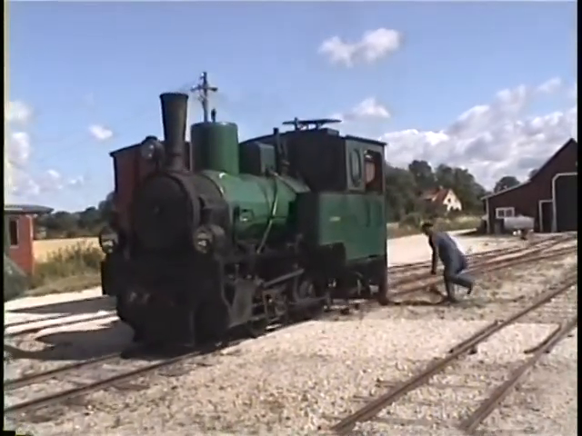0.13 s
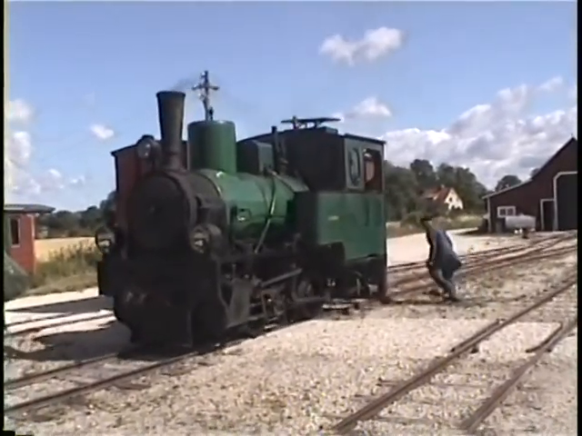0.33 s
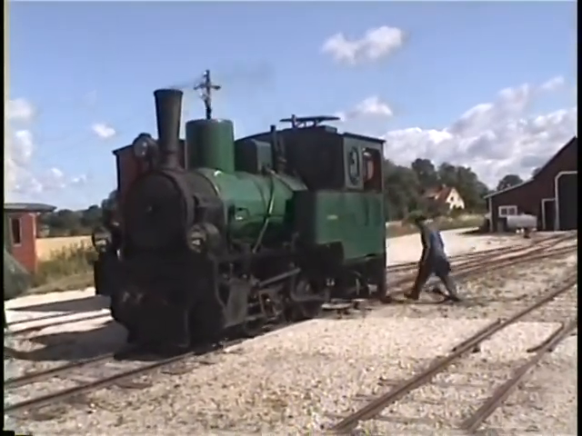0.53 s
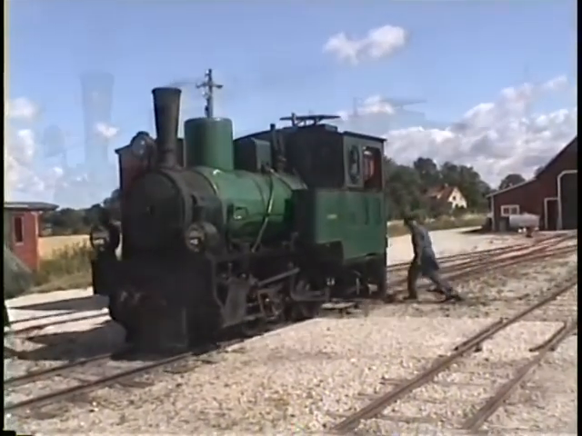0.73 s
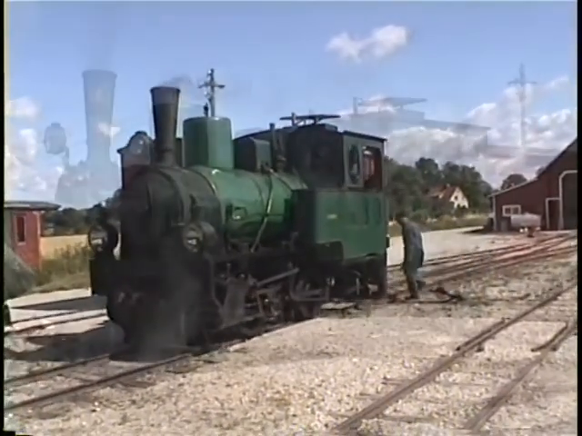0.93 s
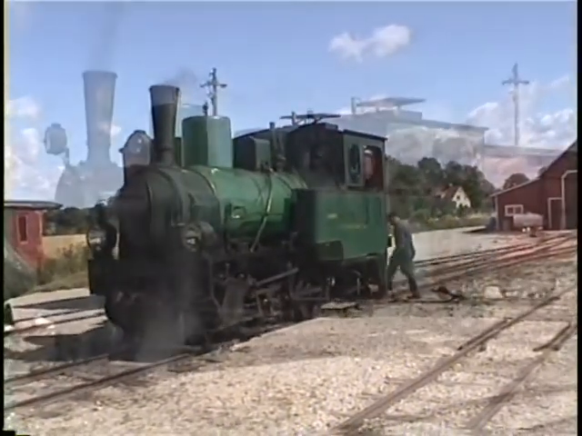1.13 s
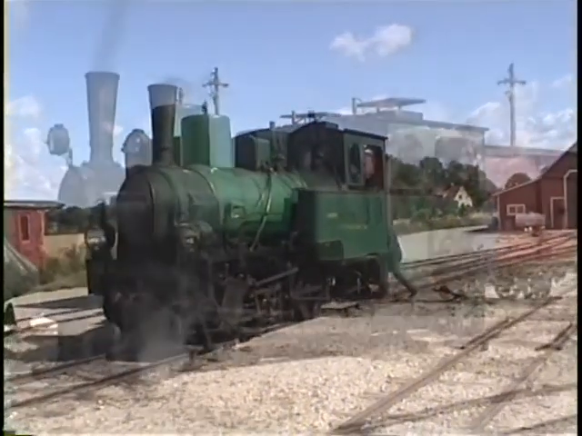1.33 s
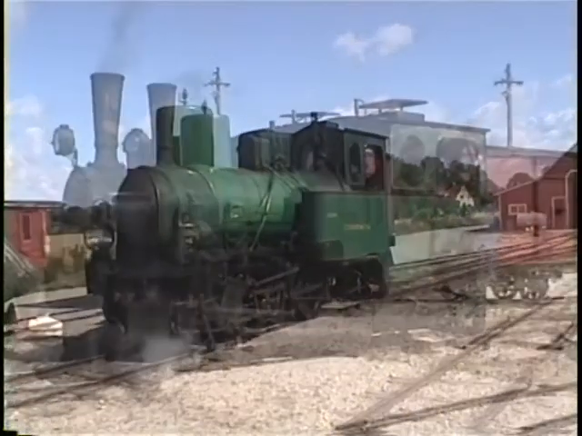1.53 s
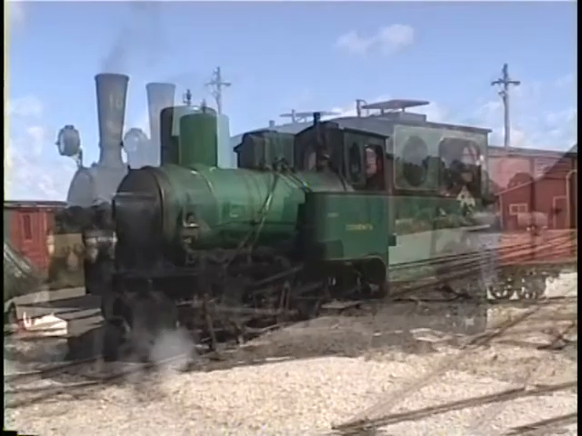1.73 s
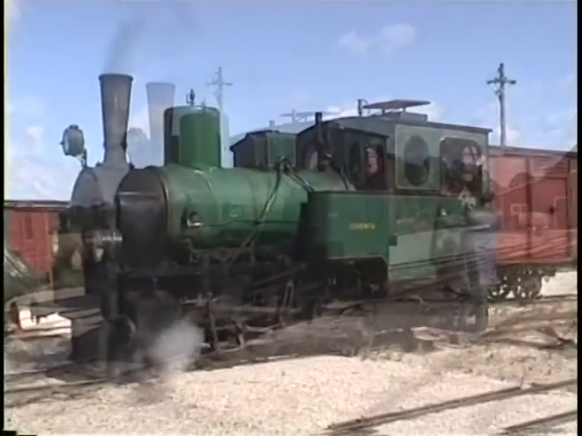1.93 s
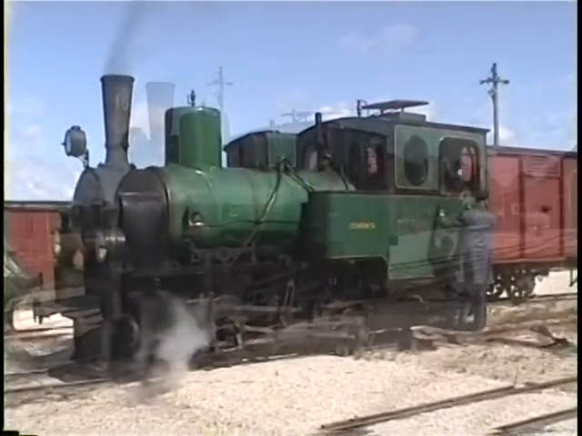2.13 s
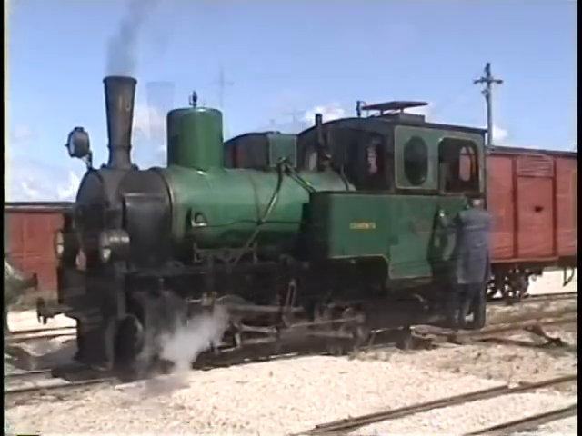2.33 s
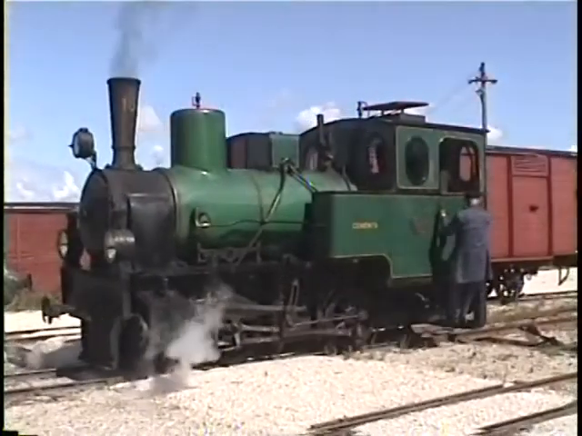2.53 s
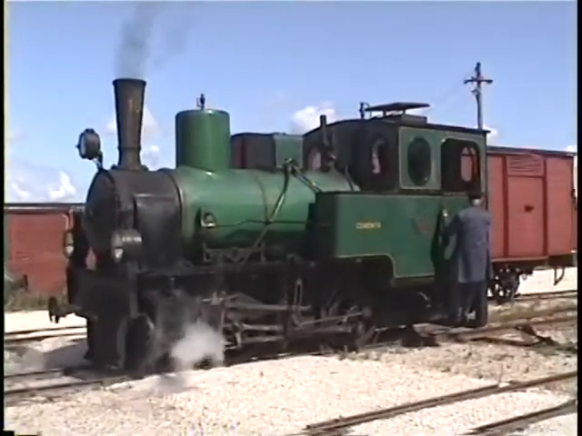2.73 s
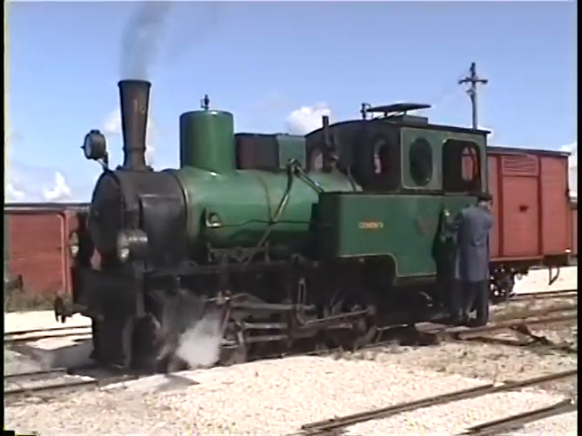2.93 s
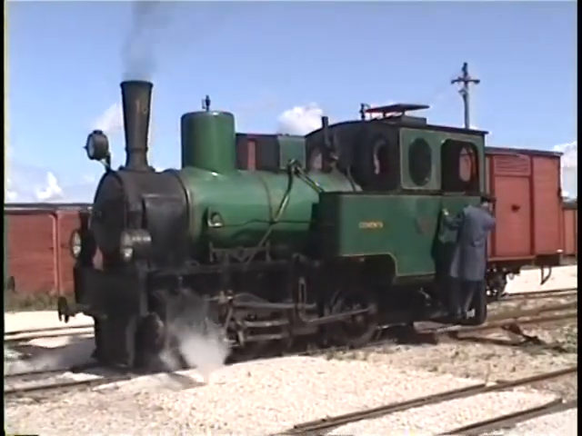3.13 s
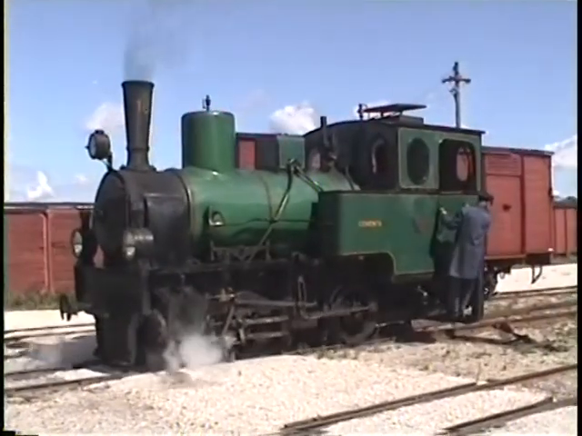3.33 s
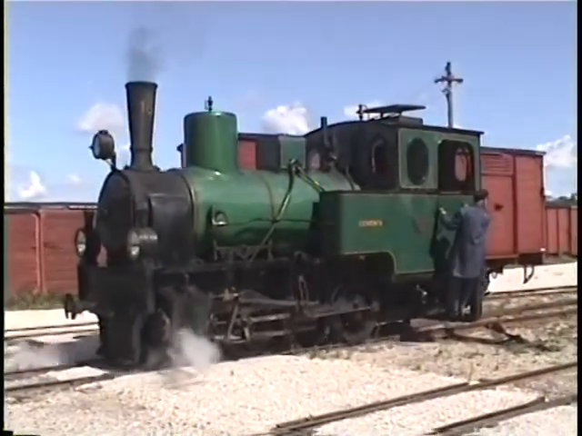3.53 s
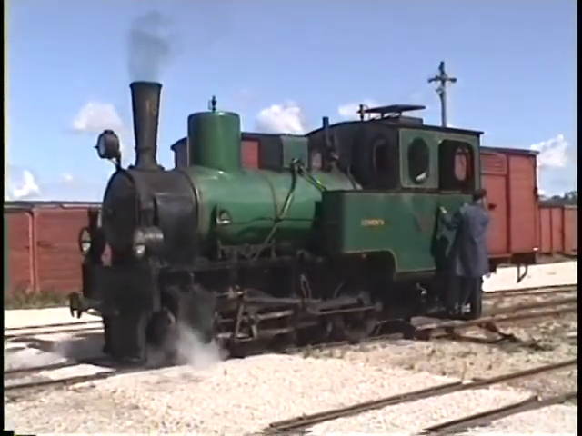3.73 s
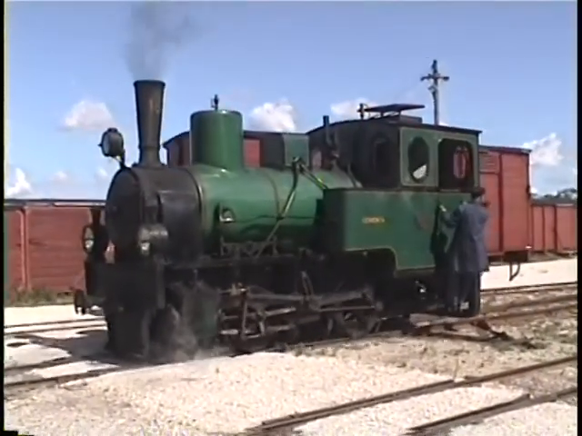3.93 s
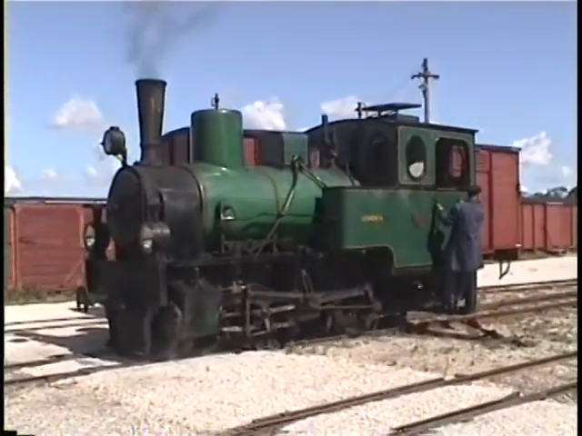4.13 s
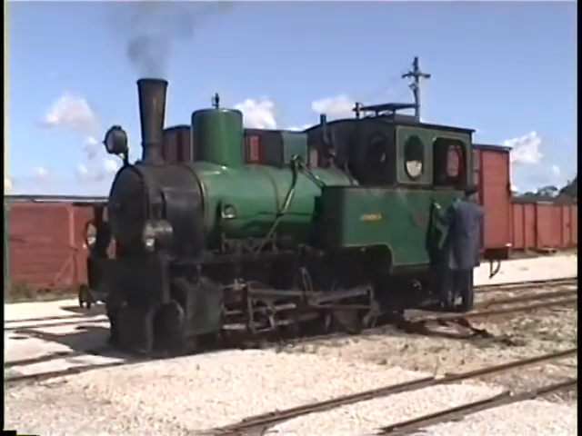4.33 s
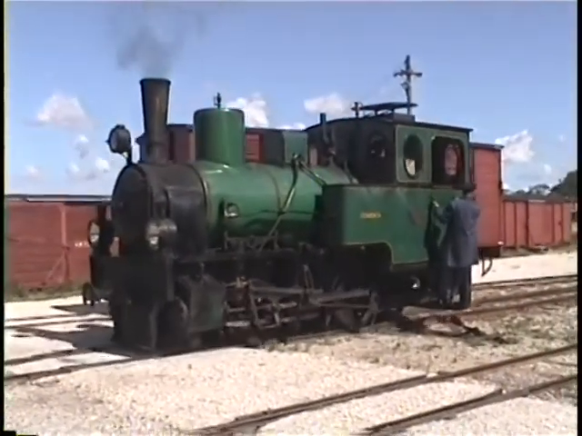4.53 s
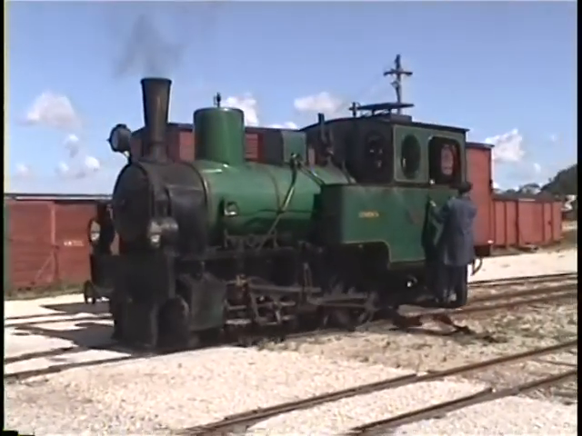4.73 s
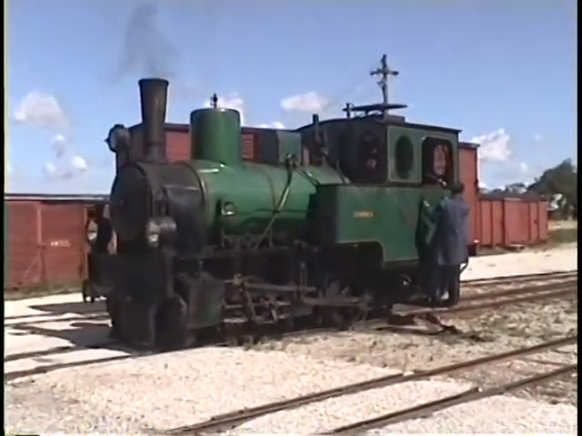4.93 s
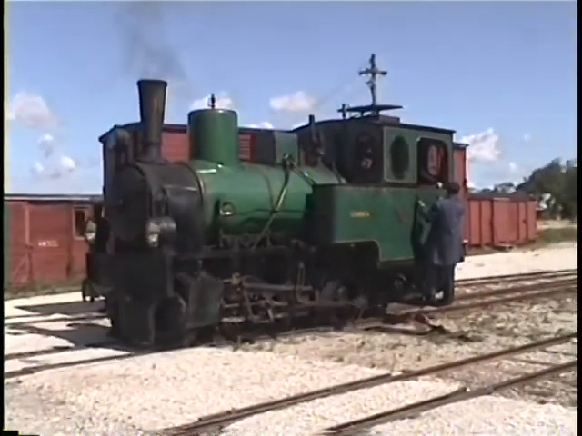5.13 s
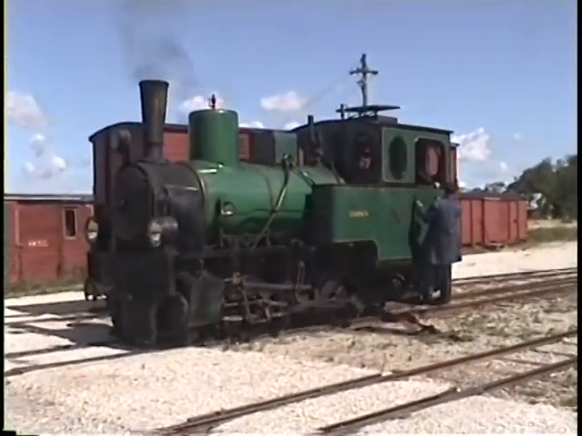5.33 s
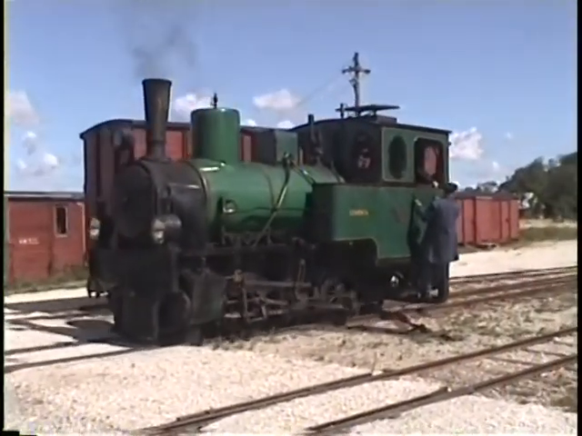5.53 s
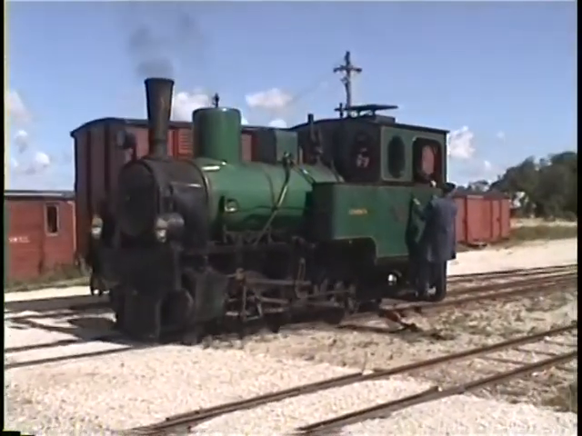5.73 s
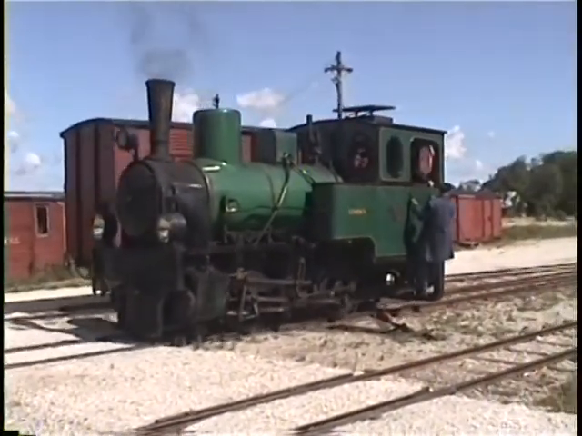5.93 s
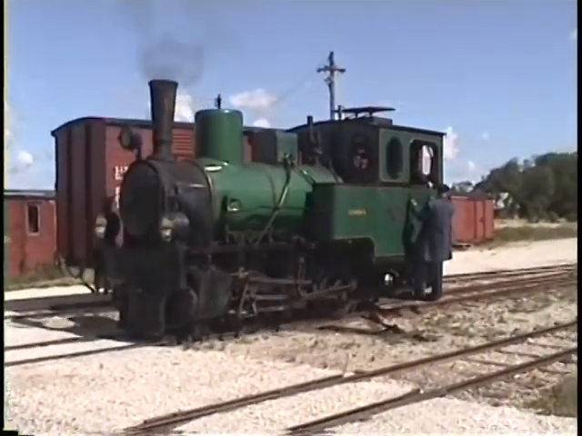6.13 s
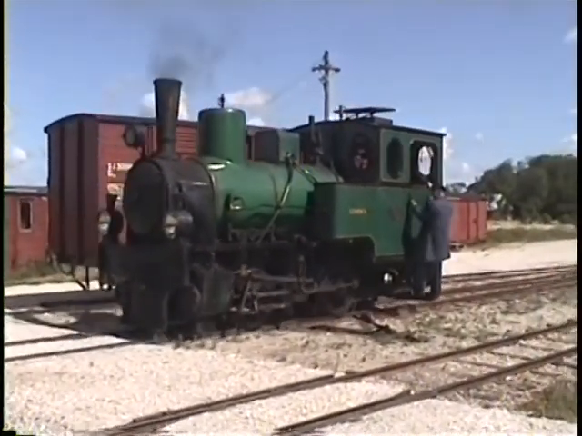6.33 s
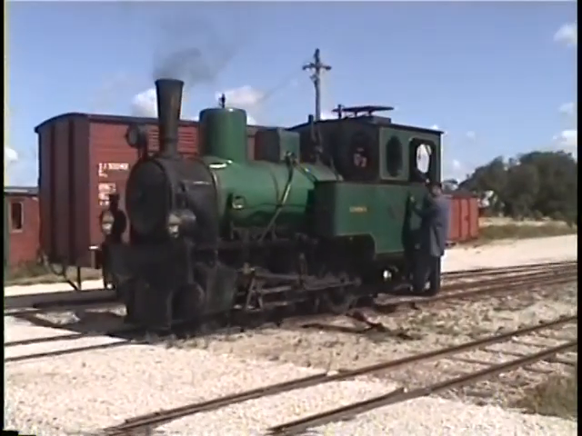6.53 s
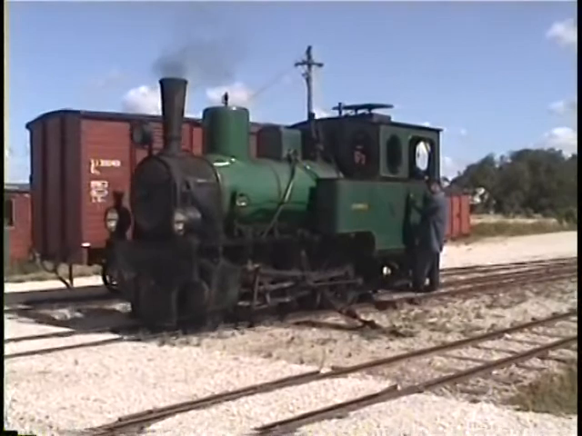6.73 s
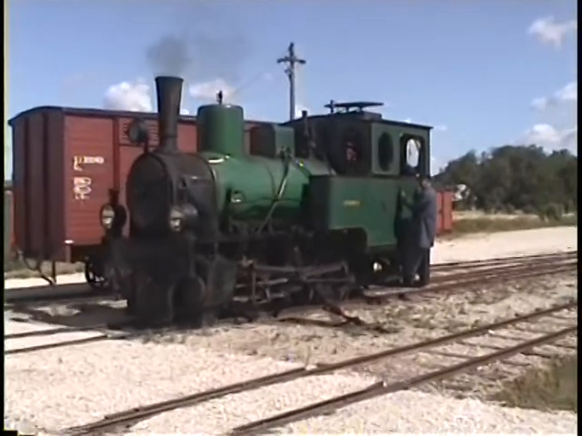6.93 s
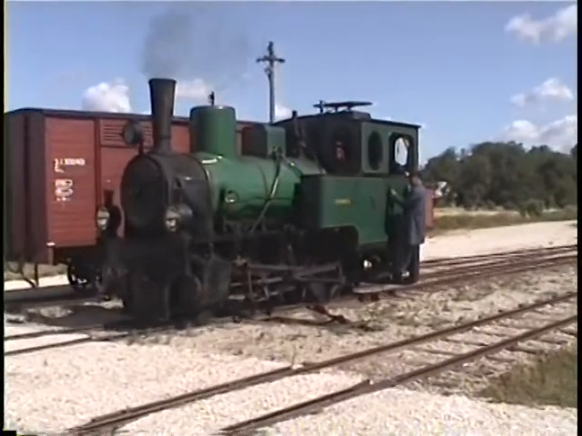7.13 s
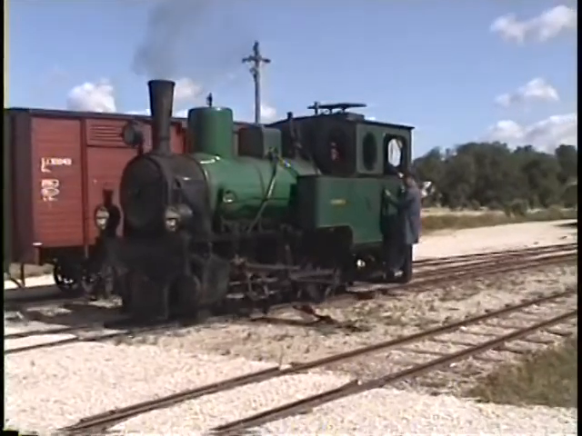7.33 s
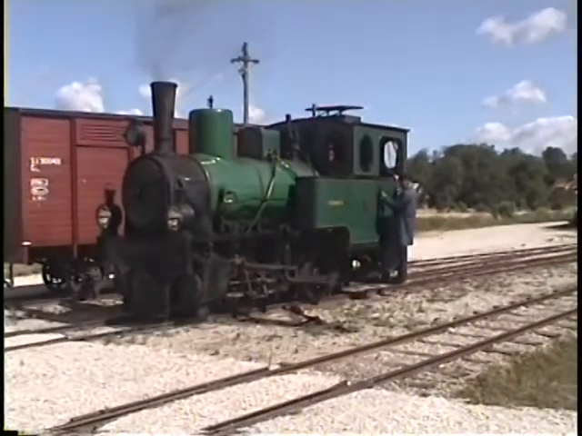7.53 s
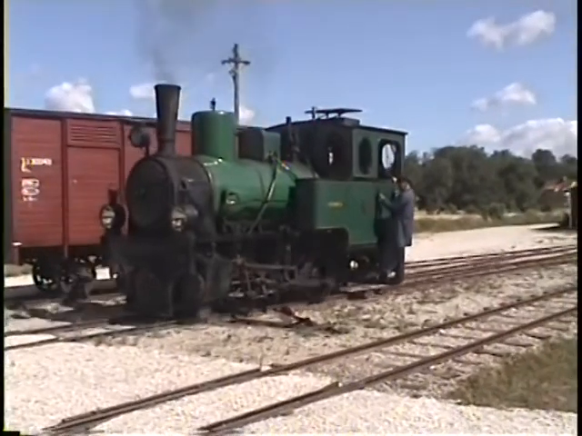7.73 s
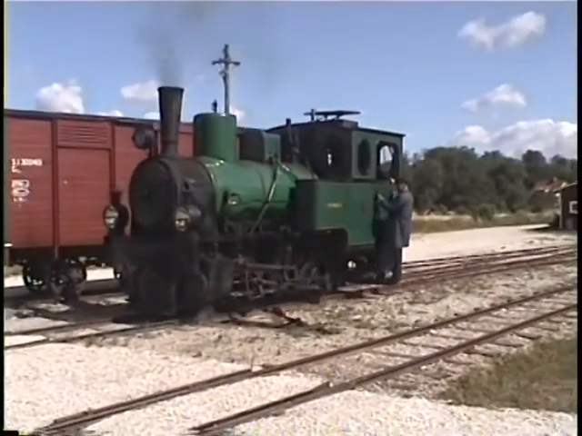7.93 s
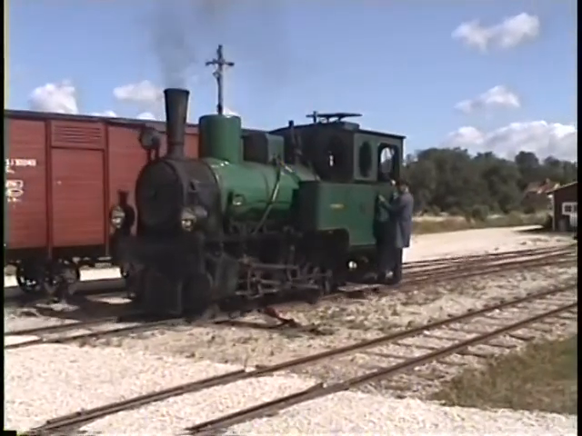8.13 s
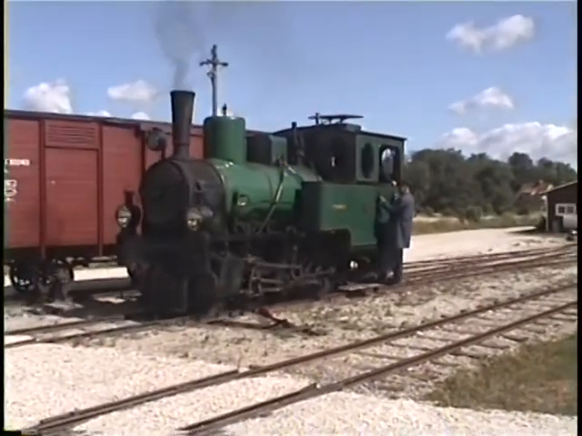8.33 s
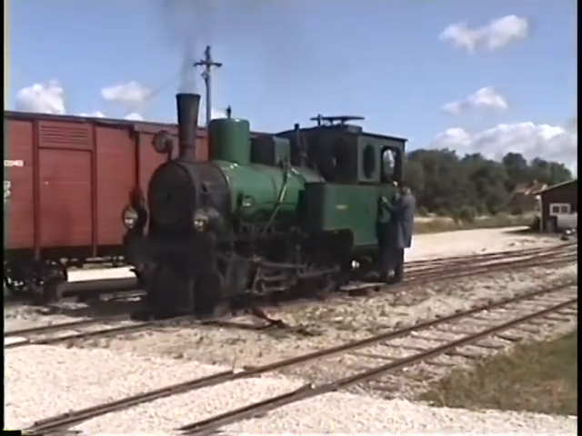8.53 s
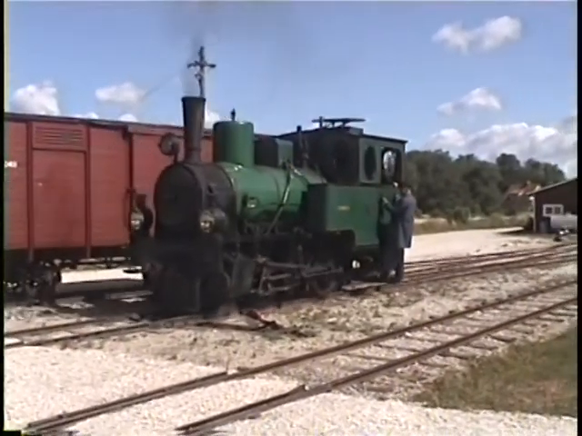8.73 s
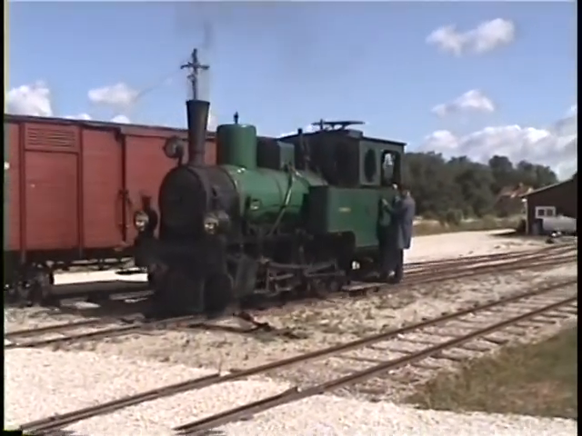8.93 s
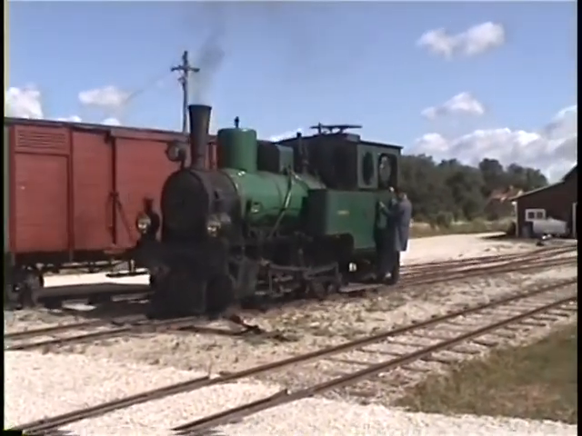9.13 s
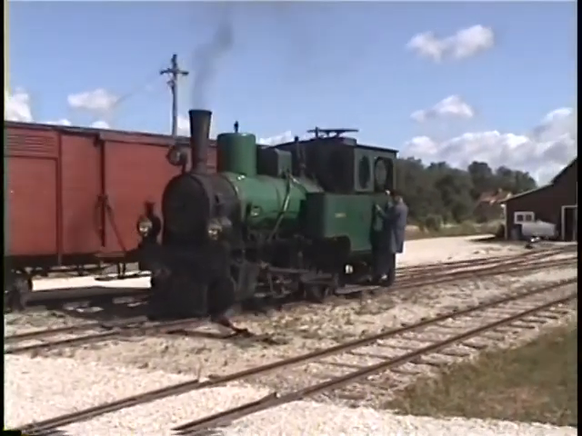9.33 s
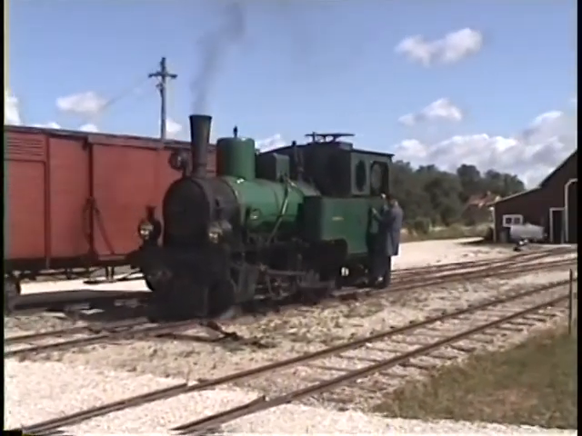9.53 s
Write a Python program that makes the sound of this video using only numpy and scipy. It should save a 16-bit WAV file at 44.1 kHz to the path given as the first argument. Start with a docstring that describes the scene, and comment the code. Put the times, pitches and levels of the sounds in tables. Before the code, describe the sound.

Loud escaping steam climbs in pitch and stops abruptly; quiet follows, then dry ticks, hard metal bangs and a run of loose iron clanking over soft hissing.

```python
"""Small steam locomotive in a yard

A thin steam leak stops; a cylinder cock then blows, rising in pitch until it is shut: shaped turbulent noise.
The boiler hisses, with wavering narrow bands, and its fire rumbles, all as filtered noise; a gland sings. Loose
ironwork ticks, squeaks, clinks and clanks; wagons and ground echo the clanks, clinks, squeaks and lever, not
the ticks, chatter or steam. One microphone with a limiter picks it all up."""
import sys
import numpy as np
from scipy import signal
from scipy.fft import rfft, irfft, next_fast_len
from scipy.io import wavfile
from scipy.ndimage import uniform_filter1d, map_coordinates

SR = 44100
rng = np.random.default_rng(int(sys.argv[2]) if len(sys.argv) > 2 else 0)


def store_wav(level_fs):
    """Save 16-bit WAV to argv[1]."""
    pcm = np.round(np.clip(np.atleast_2d(level_fs), -1, 1) * 32767)
    wavfile.write(sys.argv[1], SR, pcm.T.astype(np.int16))


N = 427769
T = np.arange(N) / SR


def amp(db):
    """Decibel law: level in dB to linear gain."""
    return 10 ** (np.asarray(db) / 20)


def unit(x):
    """Normalisation of the mean power: scales to rms 1."""
    return x / np.sqrt(np.mean(x ** 2) + 1e-20)


def along(points, hz):
    """Logarithmic frequency scale: interpolates (Hz, value) points on it."""
    f, v = np.transpose(points)
    return np.interp(np.log(hz + 1), np.log(f + 1), v)


def curves(rows):
    """Linear interpolation in time: one value per sample for each column after the time."""
    s, *cols = np.transpose(rows)
    return [np.interp(T, s, c) for c in cols]


def wobble(rate, size=N):
    """Slow random modulation: a smooth curve through `rate` random knots a second."""
    knots = rng.standard_normal(int(size * rate / SR) + 4)
    return map_coordinates(knots, [T[:size] * rate])


def ramp(start, end):
    """Linear growth: rises steadily from 0 to 1 between two times."""
    return np.clip((T - start) / max(end - start, 1e-3), 0, 1)


def release(s, db_per_s):
    """Exponential decay: 1 until time s, then a steady fall in dB."""
    return amp(-db_per_s * np.maximum(T - s, 0))


def swell(t, length):
    """Critically damped pulse: rises to 1 after length seconds, then dies away."""
    u = np.maximum(t, 0) / max(length, 1e-4)
    return u * np.exp(1 - u)


def filtered(x, response):
    """Linear filtering: multiplies the spectrum by a complex response of frequency."""
    m = next_fast_len(len(x) + 4096, True)
    return irfft(rfft(x, m) * response(np.fft.rfftfreq(m, 1 / SR)), m)[:len(x)]


def colour(points):
    """Spectral envelope: the response through (Hz, dB) points."""
    return lambda f: amp(along(points, f))


def modes(rows):
    """Modal superposition: sums (Hz, width Hz, dB) resonances with steep skirts."""
    def response(f):
        total = 0
        for centre, width, db in rows:
            damping = 1j * f * 2 * width  # doubled, because squaring narrows the peak
            total = total + amp(db) * (damping / (centre * centre - f * f + damping)) ** 2
        return total
    return response


def noise(response, size=N):
    """Coloured noise: shapes white noise by a response, to rms 1."""
    return unit(filtered(rng.standard_normal(size), response))


def breathy(hz, width_hz, size=N):
    """Quadrature modulation: carries a narrow band of noise on a pitch that may glide."""
    phase = 2 * np.pi * np.cumsum(hz * np.ones(size)) / SR
    skirt = lambda f: 1 / (1 + (f / width_hz) ** 2)
    return noise(skirt, size) * np.cos(phase) + noise(skirt, size) * np.sin(phase)


def eddies(x, depth_db):
    """Turbulent intermittency: lifts and drops patches of the spectrum."""
    z = signal.stft(x, nperseg=1024)[2]
    across_pitch = uniform_filter1d(rng.standard_normal(z.shape), size=4, axis=0)
    field = uniform_filter1d(across_pitch, size=14, axis=1)
    return unit(signal.istft(z * amp(depth_db * unit(field)), nperseg=1024)[1][:N])


def scattered(x, share, count=10):
    """Comb interference: early bounces off ground and boiler ripple the spectrum."""
    delays = rng.integers(SR // 1000, SR // 80, count)
    bounces = sum(rng.choice([-1, 1]) * np.roll(x, d) for d in delays)
    return unit(x + share * bounces)


def tap(t):
    """Damped oscillation: a couple of cycles of ring, as at the first contact of two iron parts."""
    return np.sin(2 * np.pi * 920 * t) * swell(t, 0.00056)


def ring(hz, t, length):
    """Damped mode: builds up while the parts are in contact, then dies away."""
    return np.sin(2 * np.pi * (hz * t + rng.random())) * swell(t, length) ** 1.1


def add(track, s, x):
    """Linear superposition: mixes x into the track at time s."""
    part = track[max(round(s * SR), 0):][:len(x)]
    part += x[:len(part)]


# Spectrum of the thin leak. Each row: frequency in Hz, level in dB.
LEAK_COLOUR = [(900, -21), (2000, -17), (2400, -5.5), (3000, -9), (3450, -16), (4200, -22), (4800, -17.5),
               (5600, -20), (8000, -18.5), (8900, -3.5), (9900, -3.5), (11600, -9.5), (13700, -25),
               (15500, -47)]
LEAK_DB, LEAK_SHUT_S, LEAK_FALL_DB_PER_S = -34, 0.366, 520
WEEP_DB = -66  # what still escapes until the cock opens
COCK_OPEN_S, COCK_FULL_S = 0.59, 2.71


def leak():
    """Turbulent jet noise: a thin leak that is pinched off and weeps on faintly."""
    pinched = amp(LEAK_DB) * release(LEAK_SHUT_S, LEAK_FALL_DB_PER_S)
    weep = amp(WEEP_DB) * release(COCK_OPEN_S, 18)
    steam = eddies(noise(colour(LEAK_COLOUR)), depth_db=2.0)
    return (pinched + weep) * scattered(steam, share=0.071)


# Spectra of hiss, fire and low rumble. Each row: frequency in Hz, level in dB.
HISS_COLOUR = [(500, 1.5), (1200, 2.5), (2300, 2), (3000, 3), (3750, -2), (4100, 2), (5100, 1),
               (6100, -0.5), (7400, 4), (8450, 0), (10600, 1), (12000, -3), (14000, -10.5), (15500, -40)]
FIRE_COLOUR = [(20, -8), (70, -4), (115, 0), (170, 0.5), (290, -4), (420, -9), (780, -4), (1050, -15),
               (2000, -18), (5000, -56)]
RUMBLE_COLOUR = [(15, -6.5), (35, -0.5), (60, -4.5), (100, -9.5), (200, -19), (600, -50)]
# Pipe resonances in the hiss. Each row: frequency in Hz, width in Hz, level in dB.
PIPES = [(1000, 30, -6), (4490, 200, 1), (4680, 49, -3), (5500, 70, -7), (7720, 150, -2.5),
         (9030, 270, 2.5), (10500, 130, 0)]
# Wavering narrow bands in the hiss, as reflections colour it while the microphone moves.
# Each row: centre in Hz, width in Hz, level in dB relative to the bands' common level.
WAVERING_BANDS = [(1855, 100, -1), (2064, 20, -5), (2238, 27, -5.5)]
BAND_WAVER, BAND_SWING_DB = .006, 2  # share of the centre frequency; swing of each band's level
HISS_FLUTTER_DB, HISS_PATCHY_DB = .5, 1.2
# the hiss idles; the built part is added to it as the build goes from 0 to 1
IDLE_DB, BUILT_DB, BUILD_FROM_S, BUILD_TO_S = -59.5, -43, 3.91, 6.33
# the pipe drains in one soft puff behind the closed cock
DRAIN_S, DRAIN_RISE_S, DRAIN_DB = 3.66, 0.13, -57
FIRE_IDLE_DB, FIRE_DRAUGHT_DB = -58, -6  # the fire at rest; its draught relative to the built hiss


def boiler():
    """Flow noise in resonant pipes: hiss, its wavering bands and fire draught build once the cock is shut."""
    build = ramp(BUILD_FROM_S, BUILD_TO_S) ** 1.23
    puff = amp(DRAIN_DB) * swell(T - DRAIN_S, DRAIN_RISE_S)
    steam = amp(IDLE_DB) + amp(BUILT_DB) * build + puff
    hiss_db = 20 * np.log10(steam) + HISS_FLUTTER_DB * wobble(20)
    pipes = lambda f: amp(along(HISS_COLOUR, f)) + abs(modes(PIPES)(f))
    hiss = amp(hiss_db) * scattered(eddies(noise(pipes), depth_db=HISS_PATCHY_DB), share=0.06)
    bands = np.zeros(N)
    for hz, width, db in WAVERING_BANDS:
        swing = amp(db + BAND_SWING_DB * wobble(6))
        bands += swing * breathy(hz * (1 + BAND_WAVER * wobble(4)), width)
    bands *= amp(0.74 * hiss_db - 22.0)  # grow more slowly than the hiss
    draught = amp(FIRE_IDLE_DB) + amp(FIRE_DRAUGHT_DB + BUILT_DB) * build
    flicker = amp(1.75 * wobble(11))
    fire = draught * flicker * eddies(noise(colour(FIRE_COLOUR)), depth_db=3.0)
    rumble = amp(-56.5) * noise(colour(RUMBLE_COLOUR))
    return hiss + bands + fire + rumble


# Spells in which the running gear shakes. Each row: start in seconds, hold in seconds,
# chatter level in dB, shudder level in dB, both before the mix of parts.
SHAKES = [(-.03, 0.063, -40.5, -51), (0.07, 0.054, -39.5, -49), (0.61, 0.058, -48.5, -50),
          (4.59, 0.48, -53.5, -60), (5.75, 0.31, -46, -56), (6.794, 0.045, -40.5, -53),
          (7.403, 0.13, -50, -43), (7.8, 0.074, -46, -39), (8.027, 0.97, -42, -40), (8.26, 0.24, -60, -36),
          (9.163, 0.24, -43.5, -41), (9.622, .08, -49, -39)]
# Spectrum of the small parts. Each row: frequency in Hz, level in dB.
CHATTER_COLOUR = [(90, -39), (200, 3.5), (290, 6), (480, -8), (690, -4), (1050, -9), (1600, -5),
                  (2800, -12.5), (5000, -40), (12000, -55)]
# Modes of the shuddering frame. Each row: frequency in Hz, width in Hz, level in dB.
SHUDDER = [(153.7, 43, 3), (264, 17, -3.5)]
# Modes in which the bodywork rings. Each row: frequency in Hz, width in Hz, level in dB.
BODY = [(184, 41, -1.5), (260, 29, 0), (390, 28, -5), (523, 31, -2), (630, 30, 3.5), (717, 31, -2.5),
        (799, 28, -2.5)]
SHAKE_ATTACK_S, SHAKE_FALL_DB_PER_S = 0.015, 80
CONTACTS_PER_S = 320


def chatter():
    """Random impact excitation: small parts touch and ring the bodywork; the frame shudders and rumbles."""
    loose, heavy = np.zeros(N), np.zeros(N)
    for s, hold, chatter_db, shudder_db in SHAKES:
        spell = ramp(s, s + SHAKE_ATTACK_S) * release(s + hold, SHAKE_FALL_DB_PER_S)
        loose += amp(chatter_db) * spell
        heavy += amp(shudder_db) * spell
    contacts = (rng.random(N) < CONTACTS_PER_S / SR) * rng.standard_normal(N)
    small_parts = amp(-4.0) * unit(filtered(contacts, colour(CHATTER_COLOUR)))
    bodywork = amp(-4.5) * unit(filtered(contacts, modes(BODY)))
    shudder = amp(-0.5) * heavy * noise(modes(SHUDDER))
    rumble = (amp(-2.5) * loose + amp(-12.0) * heavy) * noise(colour(FIRE_COLOUR))
    return loose * (small_parts + bodywork) + shudder + rumble


RATTLE_PER_S = 1300  # tiny contacts while the faces grind together


def grinding(response, size):
    """Shot noise: a quick shower of tiny contacts, coloured, of rms 1."""
    contacts = (rng.random(size) < RATTLE_PER_S / SR) * rng.standard_normal(size)
    return unit(filtered(contacts, response))


def burst(response, t, length, order=1, source=noise):
    """Pulsed noise: coloured noise under a swell, whose order delays and sharpens the onset."""
    envelope = swell(t, length) ** order
    return unit(envelope * source(response, len(t))) * np.sqrt(np.mean(envelope ** 2))


# Iron clanks. Each row: start in seconds, strength in dB, hardness of the contact in dB,
# shift from frame to plates in dB, basic length in seconds (each part scales it), boom pitch in Hz,
# boom delay in seconds, plate pitch in Hz.
CLANKS = [ (0.089, -27, 4.5, -3, 0.0038, 284, 0.007, 910), (0.103, -35, 5, 6, 0.006, 240, .002, 650),
          (0.141, -29.5, 5, -3.5, 0.0058, 290, 0.0036, 670),
          (0.384, -30.5, 0, -0.5, 0.005, 303, 0.011, 700), (0.62, -33.5, -3, -2, 0.0048, 279, 0.0021, 770),
          (0.829, -37, 2, -1.5, 0.0069, 282, 0.005, 769), (0.984, -45, -6, -2.5, 0.0062, 250, 0, 700),
          (1.727, -36.5, -1, -2, 0.0062, 258, 0.009, 780), (2.003, -41, -8, -1, 0.0063, 263, 0.0014, 581),
          (3.615, -40.5, 7, 5.5, 0.0088, 270, 0, 702), (3.687, -44, 13.5, 8.5, 0.0084, 270, 0.013, 760),
          (3.717, -42, -2, 3, 0.047, 275, 0.0048, 680), (4.854, -42, -1, 4, 0.016, 298, 0.0017, 695),
          (4.89, -40.5, -10, -7, .006, 220, 0, 700), (5.750, -15, 0.5, 1, 0.0076, 261, 0.0066, 936),
          (5.832, -13.5, 0.5, 1.5, 0.0078, 253, 0.0095, 773),
          (5.943, -16, -9.5, 1, 0.0074, 284, 0.0061, 650), (6.014, -22, -9.5, 0.5, 0.011, 275, 0.005, 550),
          (6.073, -26.5, -11, 0, 0.017, 270, 0.0018, 790), (6.756, -39.5, -2, 3.5, 0.015, 248, 0, 720),
          (6.802, -29, 1, 3.5, 0.01, 244, .003, 934), (7.811, -26.5, -4, 0, 0.014, 204, 0.0018, 730),
          (7.912, -35, -7, -4, 0.011, 217, 0.00021, 860), (8.027, -23, -2.5, -0.5, 0.011, 292, 0.0018, 638),
          (8.146, -22, 0, 0, 0.011, 260, 0.00059, 617),
          (8.173, -28.5, -4, -5.5, 0.0073, 198, 0.0000052, 710),
          (8.245, -22, 1, 2, 0.011, 270, 0.0012, 695), (8.271, -26.5, -15, -5, 0.0044, 250, 0, 646),
          (8.342, -18, 2, 1.5, 0.012, 250, 0, 762), (8.365, -26.5, -5, -4, 0.0074, 236, 0.0011, 720),
          (8.461, -23, 3.5, -1, 0.011, 332, 0, 610), (8.495, -32, -6, -5, .007, 189, 0, 636),
          (8.613, -22.5, -2.5, -2, 0.0093, 283, 0.0054, 720),
          (8.665, -22.5, -1.5, 2.5, 0.014, 308, 0.0046, 721),
          (8.819, -22, 8.5, 2.5, 0.01, 287, 0.00049, 823), (8.936, -29, 7, 3, 0.011, 182, 0.0048, 783),
          (8.959, -25.5, -9, 1, 0.0099, 390, 0, 643), (9.146, -25, 3, -0.5, 0.01, 286, 0.017, 704),
          (9.258, -30, 2, 1, .006, 278, 0.0028, 636), (9.578, -33.5, 4, 0.5, 0.017, 262, 0.0095, 780),
          (9.600, -21.5, 8, 1, 0.0095, 352, .004, 650), (9.656, -31.5, -5, -2, 0.017, 249, 0, 714)]
# Modes of plates and of striking faces. Each row: frequency in Hz, width in Hz, level in dB.
PLATES = [(660, 148, 9), (754, 160, 0.5), (1010, 61, -3.5)]
FACES = [(1487, 63, 4), (1677, 45, 2), (2040, 100, -1), (2330, 100, -1), (2925, 195, -3.5),
         (5170, 460, -11.5)]
# Spectra of rattle, crack and thud. Each row: frequency in Hz, level in dB.
RATTLE_COLOUR = [(700, -7), (1400, 7), (2100, 0), (3000, -3.5), (4200, -21), (9000, -72)]
CRACK_COLOUR = [(2000, -23), (3600, -0.5), (5500, -5), (8000, -4), (11000, -5.5), (15500, -50)]
THUD_COLOUR = [(60, -23), (150, -6), (300, -1.5), (420, -3), (600, -12.5), (1200, -55)]
# parts relative to the strength, before hardness and shift; the crack's holds for a blow of -22.5 dB
BOOM_DB, THUD_DB, PLATE_DB, CLANG_DB = 1, -3.5, -7.5, -5.5
TAP_DB, RATTLE_DB, RING_DB, CRACK_DB = -0.5, -10, -15.5, -15.5
TAP_FULL_S = 0.0072  # slower blows tap more softly
BODY_RING_DB = -17


def clanks():
    """Modal response to impact: slack iron taps, clangs, rattles and cracks; frame and bodywork ring on."""
    track, t = np.zeros(N), np.arange(SR // 4) / SR
    for s, db, hard_db, bright_db, length, boom_hz, boom_delay, plate_hz in CLANKS:
        first_tap = amp(TAP_DB) * min(TAP_FULL_S / length, 1) * tap(t - .0015)
        plate = amp(PLATE_DB) * ring(plate_hz, t, 0.67 * length)
        clang = amp(CLANG_DB) * burst(modes(PLATES), t, 0.89 * length)
        plates = first_tap + plate + clang
        # the faces take a few milliseconds to bite, hence the higher orders
        rattle = amp(RATTLE_DB) * burst(colour(RATTLE_COLOUR), t, 1.25 * length, order=3, source=grinding)
        face_ring = amp(RING_DB) * burst(modes(FACES), t, 1.15 * length, order=2)
        crack_db = CRACK_DB + 0.59 * (db + 22.5)  # heavy blows crack more
        crack = amp(crack_db) * burst(colour(CRACK_COLOUR), t, length, order=4)
        faces = rattle + face_ring + crack
        boom = amp(BOOM_DB) * ring(boom_hz, t - boom_delay, 0.66 * length)
        thud = amp(THUD_DB) * burst(colour(THUD_COLOUR), t, 1.29 * length, order=2)
        frame = boom + thud
        blow = amp(bright_db) * plates + amp(hard_db) * faces + amp(-bright_db) * frame
        add(track, s, amp(db) * blow)
    return track + amp(BODY_RING_DB) * filtered(track, modes(BODY))


JINGLE_DB, JINGLE_PER_S, JINGLE_FALL_DB_PER_S = -20, 240, 144


def jingle():
    """Decaying random impacts: after each clank, tiny contacts of loose links ring the iron faces."""
    shaking = np.zeros(N)
    for s, db, hard_db, _, length, *_ in CLANKS:
        after = T > s + length
        shaking += amp(db + hard_db / 2) * after * release(s, JINGLE_FALL_DB_PER_S)
    contacts = (rng.random(N) < JINGLE_PER_S / SR) * rng.standard_normal(N)
    return amp(JINGLE_DB) * shaking * unit(filtered(contacts, modes(FACES)))


# Reverberation of the yard. Each row: frequency in Hz, time to fall by 60 dB in seconds.
YARD = [(150, 0.85), (800, 0.32), (2500, 0.025), (10000, 0.039)]


def yard(x):
    """Diffuse reverberation: wagons and ground scatter a short, dull tail."""
    hz, t, z = signal.stft(rng.standard_normal(SR // 2), SR, nperseg=256)
    decay = amp(-60 * t / along(YARD, hz)[:, None])
    tail = signal.istft(z * decay, SR, nperseg=256)[1]
    delayed = np.pad(x, (int(.018 * SR), 0))
    return signal.fftconvolve(delayed, tail / np.linalg.norm(tail))[:N]


# Breathy whistle of the jet. Each row: time in seconds, centre pitch in Hz.
WHISTLE = [(.65, 8600), (1.5, 8800), (2.0, 9110), (2.4, 9560), (2.7, 10160), (2.9, 10760), (3.3, 11150),
           (3.6, 11280)]
# Spectra of jet, sputter, spray and spits. Each row: frequency in Hz, level in dB.
JET_COLOUR = [(30, -10.5), (300, -11.5), (1300, -13), (2100, -11.5), (2700, -0.5), (3250, 2), (3900, -4),
              (6000, -0.5), (7900, 0.5), (8700, 6), (9900, 3), (11700, 0.5), (12500, -9), (15500, -27)]
SPUTTER_COLOUR = [(30, 10.5), (120, 4), (400, 2.5), (2300, -2), (4500, -1.5), (10000, -23)]
SPRAY_COLOUR = [(7000, -40), (10500, -5), (11700, -8), (12600, 8), (13400, 7), (15600, 0)]
SPIT_COLOUR = [(1500, 6), (2900, 4), (4000, -8), (7000, -6), (10000, 3.5), (13000, -8), (15000, -27)]
# Spits from the cock. Each row: start in seconds, level in dB, rise time in seconds.
SPITS = [(0.442, -49, 0.004), (0.454, -39, 0.0049), (0.517, -42, 0.0041), (3.706, -42, 0.013)]
COCK_SHUT_S, COCK_FALL_DB_PER_S = 3.628, 946
# levels with the cock wide open, jet and whistle before the ceiling; the pressure then sags
JET_DB, WHISTLE_DB, SPRAY_DB, SAG_DB_PER_S = -25.5, -30, -38, 1.6
SPRAY_GROWS = 1.2  # fine spray grows as this power of the opening
JET_CEILING = 3.3  # the jet's swings level off at about this many times their rms


def cock():
    """Turbulent jet noise: a widening cock sounds louder, finer and higher, then shuts in hundredths of a second."""
    opening = ramp(COCK_OPEN_S, COCK_FULL_S)
    pitch_hz, = curves(WHISTLE)
    jet = amp(JET_DB) * scattered(eddies(noise(colour(JET_COLOUR)), depth_db=1.4), share=0.056)
    whistle = amp(WHISTLE_DB) * breathy(pitch_hz, width_hz=680)
    rms = np.std(jet + whistle)
    rush = rms * unit(np.tanh((jet + whistle) / (JET_CEILING * rms)))
    # slugs of condensed water, 330 a second, make the jet sputter
    slugs = (rng.random(N) < 330 / SR) * rng.uniform(-1, 1, N)
    sputter = amp(JET_DB - 17.0) * unit(filtered(slugs, colour(SPUTTER_COLOUR)))
    spray = amp(SPRAY_DB + 1.5 * wobble(4.6)) * noise(colour(SPRAY_COLOUR))
    flow = opening * (rush + sputter) + opening ** SPRAY_GROWS * spray
    pressure = release(COCK_FULL_S, SAG_DB_PER_S) * release(COCK_SHUT_S, COCK_FALL_DB_PER_S)
    spits = sum(amp(db) * swell(T - s, length) for s, db, length in SPITS)
    return flow * pressure + spits * noise(colour(SPIT_COLOUR))


# Light dry ticks, and the high ring of one steam spit (the first row).
# Each row: start in seconds, level in dB, level of the high ring relative to it in dB.
TICKS_AND_SPIT_RING = [(0.52, -47, 11), (4.059, -42, -25), (4.449, -37.5, -28), (4.547, -30.5, -25),
                       (4.590, -13, -35), (4.634, -21, -14), (4.682, -23, -25), (7.636, -27, -25),
                       (7.645, -12, -11.5), (7.655, -25, -18), (7.660, -23, -14)]
HIGH_RING_HZ, HIGH_RING_RISE_S = 2800, 0.00057


def ticks_and_spit_ring():
    """Damped oscillation without echo: light, dry ticks and one spit's ring, each a tap, click and high ring."""
    track, t = np.zeros(N), np.arange(SR // 30) / SR
    dull = lambda f: 1 / (1 + (f / 6000) ** 2)
    for s, db, ring_db in TICKS_AND_SPIT_RING:
        click = amp(-18.0) * amp(-60 * t / 0.016) * noise(dull, len(t))
        high_ring = amp(ring_db) * np.sin(2 * np.pi * HIGH_RING_HZ * t) * swell(t, HIGH_RING_RISE_S)
        add(track, s, amp(db) * (tap(t) + click + high_ring))
    return track


# Squeaks and short clinks of iron (the clinks at 8.389, 8.425 and 8.539 s). Each row: start in seconds,
# level in dB, pitch in Hz, time before the fall in seconds, fall per overtone in dB.
SQUEAKS_AND_CLINKS = [(4.887, -18.5, 2322, 0.013, 4.5), (4.942, -43.5, 2370, .022, 6),
                      (6.327, -42.5, 1634, 0.018, 10), (8.109, -35, 1610, 0.008, 11),
                      (8.389, -42, 2800, .007, 19), (8.425, -25, 1645, 0.0043, 19),
                      (8.539, -27, 1503, 0.0041, 8)]
ATTACK_S, TONE_FALL_DB_PER_S, SCRAPE_DB = 0.0066, 955, -20


def squeaks_and_clinks():
    """Harmonic synthesis with random modulation: iron sounds an unsteady pitch with overtones, then rings out."""
    track, t = np.zeros(N), np.arange(SR // 10) / SR
    unsteady = lambda hz: noise(lambda f: 1 / (1 + (f / hz) ** 4), len(t))
    for s, db, hz, length, fall_db in SQUEAKS_AND_CLINKS:
        phase = 2 * np.pi * np.cumsum(hz + 26 * unsteady(450)) / SR
        tone = np.zeros(len(t))
        for k in range(5):
            level = amp(-fall_db * k + 2.6 * unsteady(400))
            tone += level * np.sin((k + 1) * phase + .27 * k * unsteady(450))
        scrape = amp(SCRAPE_DB) * noise(lambda f: 1 / (1 + (f / (3 * hz)) ** 2), len(t))
        fall = amp(-TONE_FALL_DB_PER_S * np.maximum(t - length, 0))
        envelope = np.minimum(t / ATTACK_S, 1) * fall
        add(track, s, amp(db) * envelope * (unit(tone) + envelope * scrape))
    return track


# Faint, broken notes of a gland. Each row: start in seconds, length in seconds, pitch in Hz, level in dB.
SINGING = [(5.24, 0.45, 2900, -54), (6.42, 0.31, 1745, -47.5), (7.12, 0.32, 2020, -55),
           (7.27, 0.22, 1790, -54), (7.9, 0.413, 1800, -50), (8.359, 0.47, 1622, -45.5),
           (9.28, 0.28, 1860, -51)]
SING_RISE_HZ, SING_WIDTH_HZ, SING_FLICKER_DB = 99.7, 45, 4


def singing():
    """Narrow-band flow noise: a leaking gland sings in faint, breathy notes that drift upward."""
    track = np.zeros(N)
    for s, length, hz, db in SINGING:
        size = int(length * SR)
        drift_hz = SING_RISE_HZ * np.linspace(-.5, .5, size)
        pitch = hz * (1 + .01 * wobble(25, size)) + drift_hz
        level = amp(db + SING_FLICKER_DB * wobble(29.8, size)) * signal.windows.tukey(size)
        add(track, s, level * breathy(pitch, width_hz=SING_WIDTH_HZ, size=size))
    return track


# Modes of a steel lever. Each row: frequency in Hz, width in Hz, level in dB.
LEVER = [(1640, 70, -2), (2090, 130, 0), (2490, 120, 0), (4570, 210, -8), (5150, 120, -6.5)]
LEVER_S, LEVER_DB, LEVER_LENGTH_S = 8.825, -22.5, 0.0068


def lever():
    """Modal resonance: a steel lever hits its stop, and a burst of noise rings its bright modes."""
    return amp(LEVER_DB) * swell(T - LEVER_S, LEVER_LENGTH_S) * noise(modes(LEVER))


def scene():
    """Superposition: all sources meet at one microphone, given to two equal channels."""
    iron = clanks() + jingle() + lever() + squeaks_and_clinks()
    steam = leak() + cock() + boiler() + singing()
    mono = steam + chatter() + ticks_and_spit_ring() + iron + amp(-19.0) * yard(iron)
    return np.array([mono, mono])


# What the limiter listens to. Each row: frequency in Hz, emphasis in dB.
LIMITER_EMPHASIS = [(800, -0.5), (2500, -0.5), (5000, 9), (9000, 3.5)]
LIMIT_DB, RECOVERY_DB_PER_S = -11.5, 66
TOP_HZ = 15720  # band limit


def record(dry):
    """Peak limiting: ducks on peaks, bright ones most, recovers steadily; then cuts all above the band limit."""
    sensed = filtered(dry[0], colour(LIMITER_EMPHASIS))
    over_db = np.maximum(20 * np.log10(abs(sensed) + 1e-9) - LIMIT_DB, 0)
    recovery_db = RECOVERY_DB_PER_S * T
    # the running maximum holds each peak while the recovery line wears it down
    duck_db = np.maximum.accumulate(over_db + recovery_db) - recovery_db
    gain = amp(-uniform_filter1d(duck_db, size=24))
    return np.array([filtered(side * gain, lambda f: f < TOP_HZ) for side in dry])


dry = scene()
out = record(dry)
store_wav(out)
```